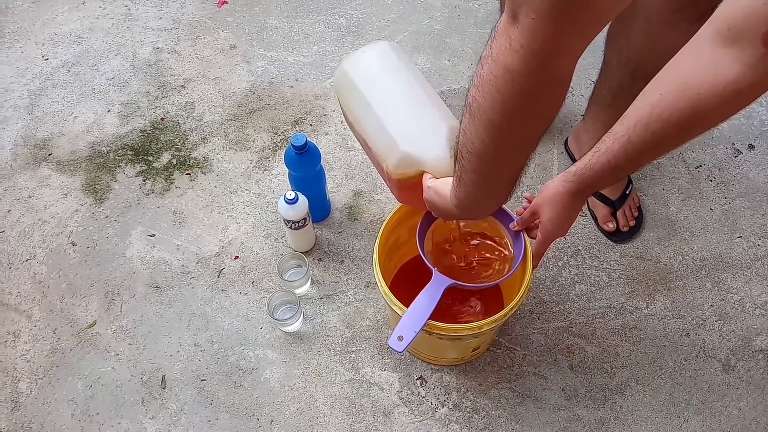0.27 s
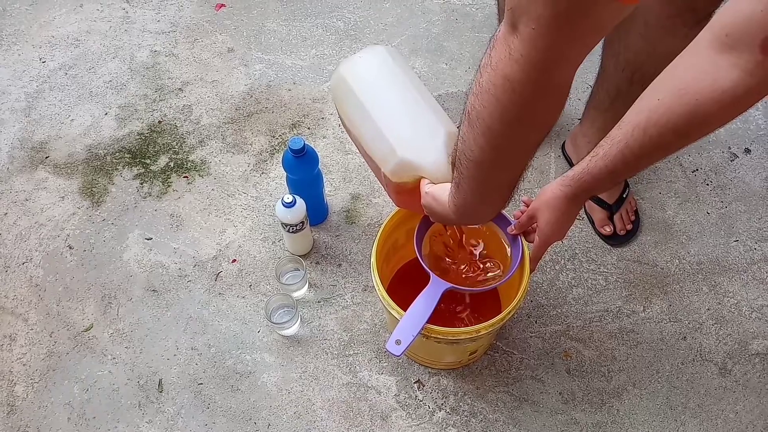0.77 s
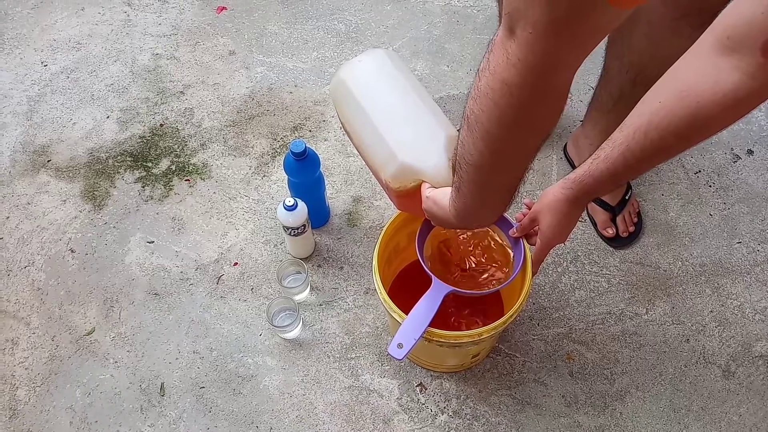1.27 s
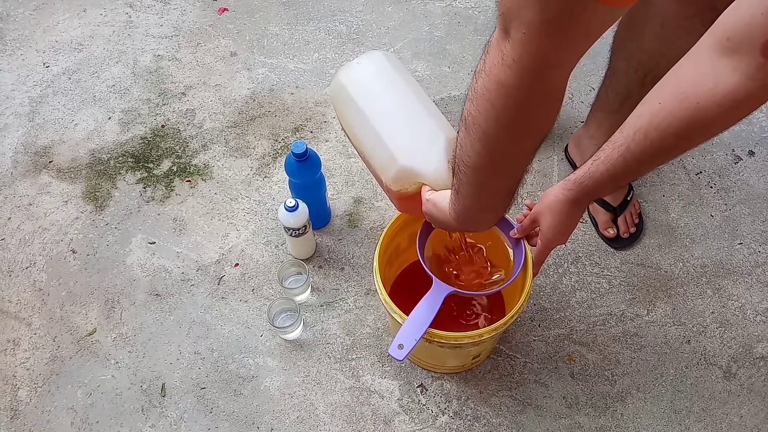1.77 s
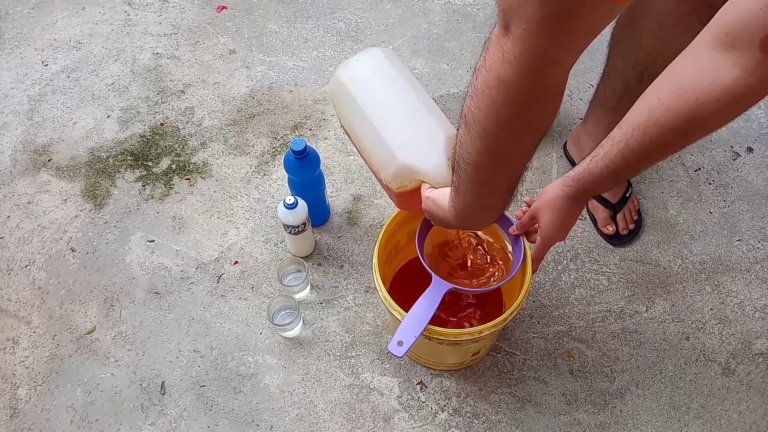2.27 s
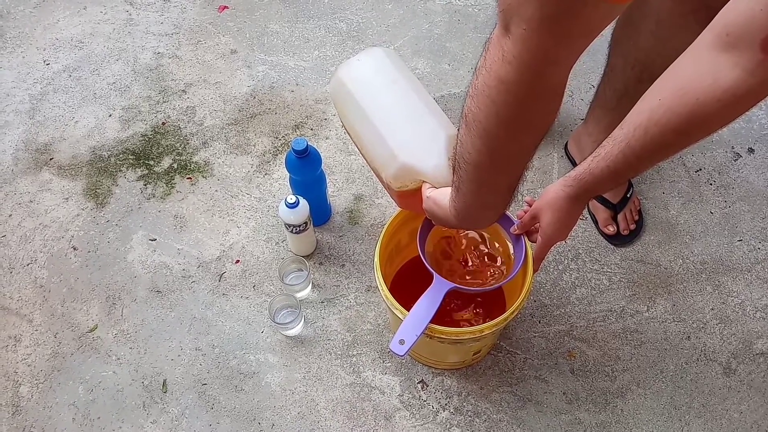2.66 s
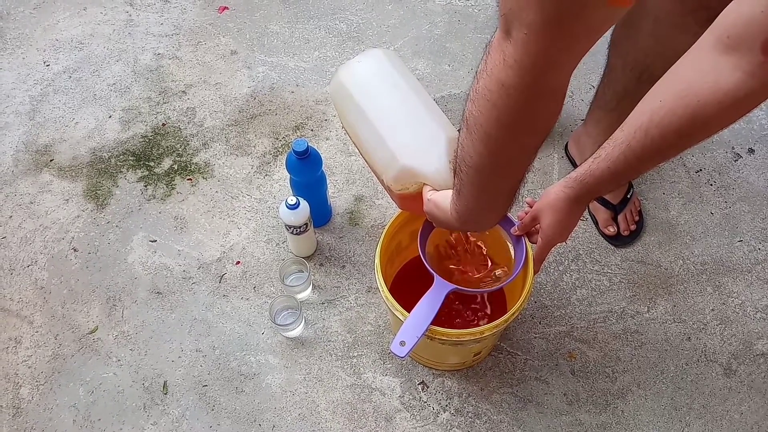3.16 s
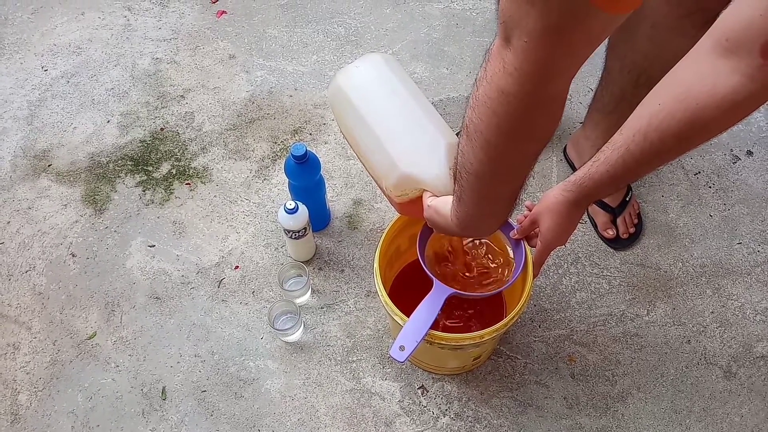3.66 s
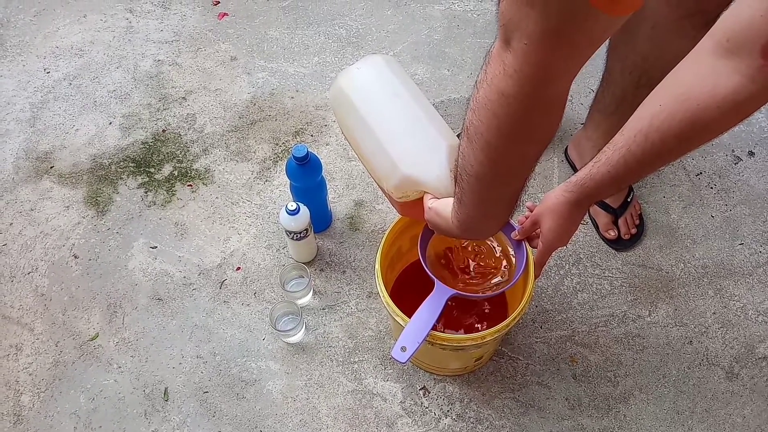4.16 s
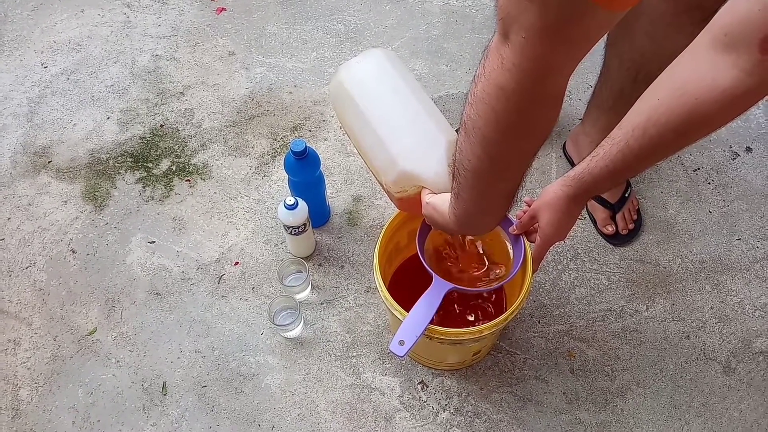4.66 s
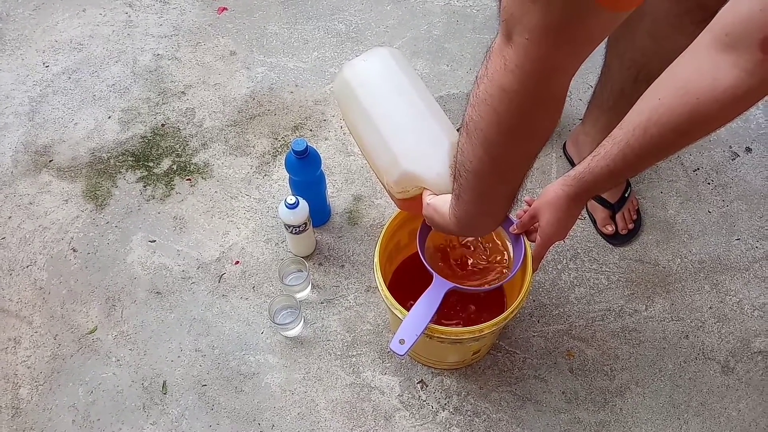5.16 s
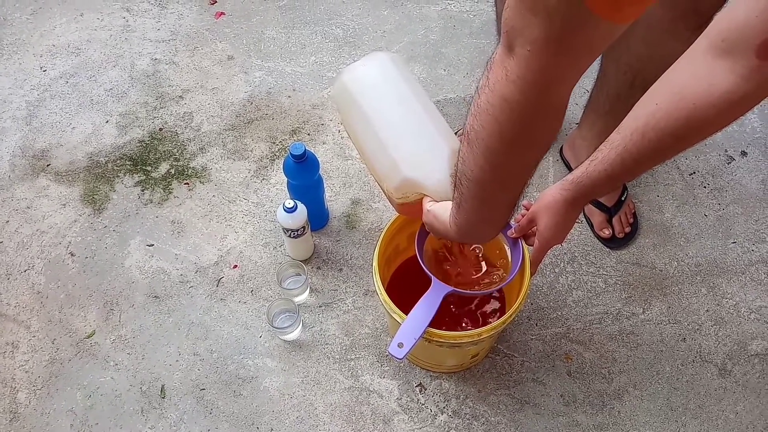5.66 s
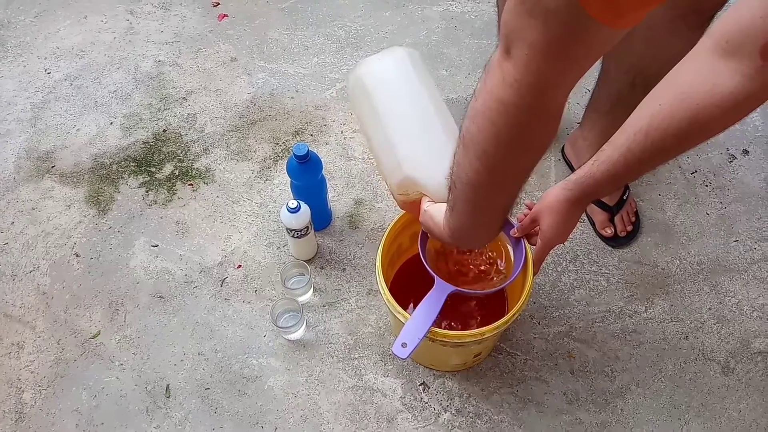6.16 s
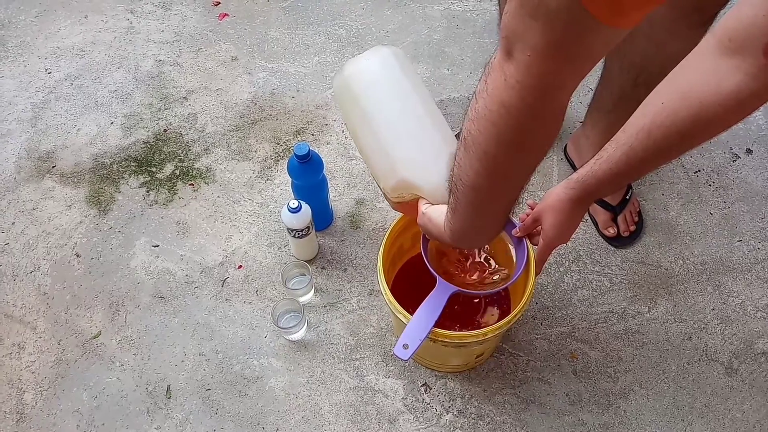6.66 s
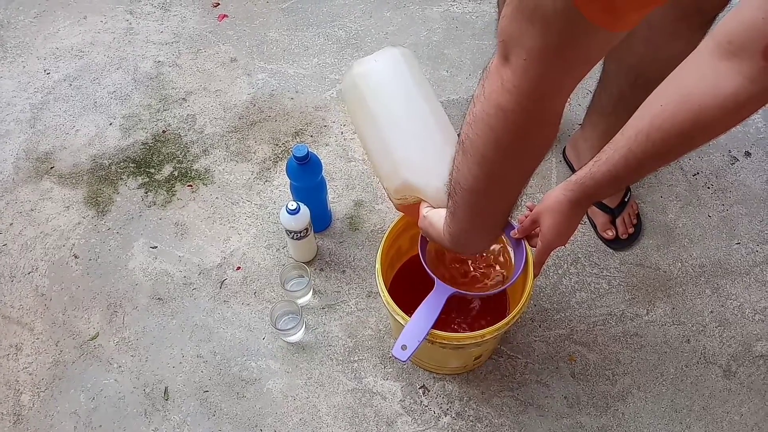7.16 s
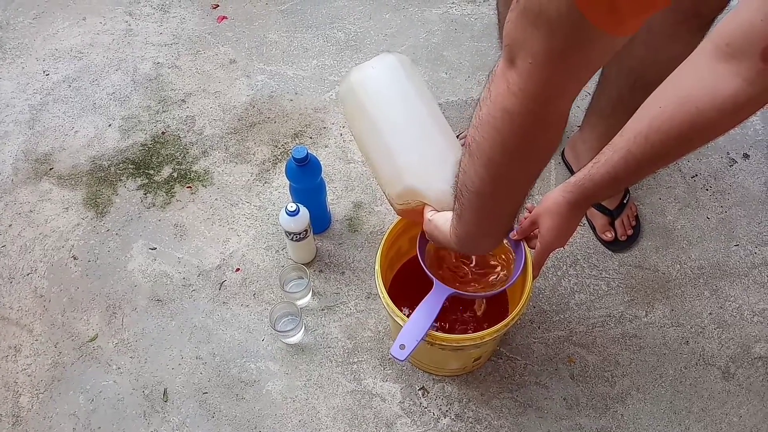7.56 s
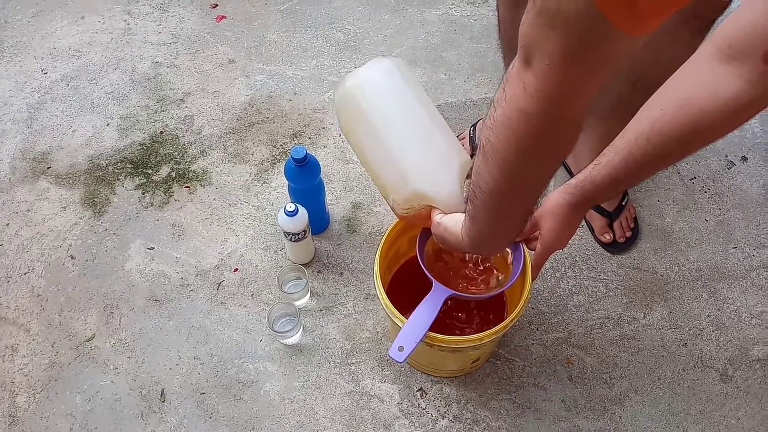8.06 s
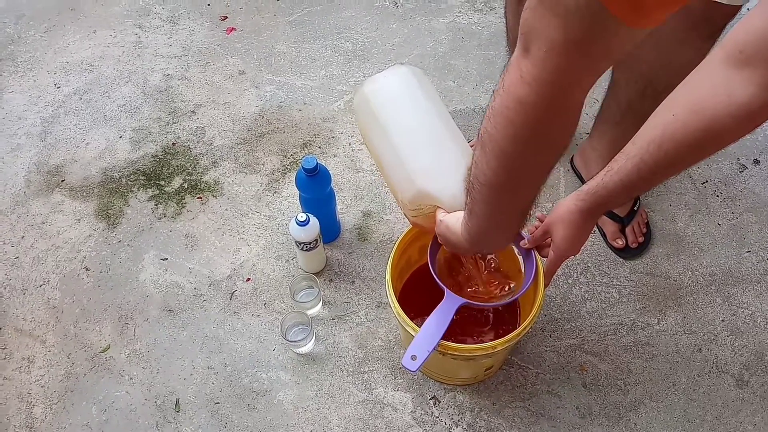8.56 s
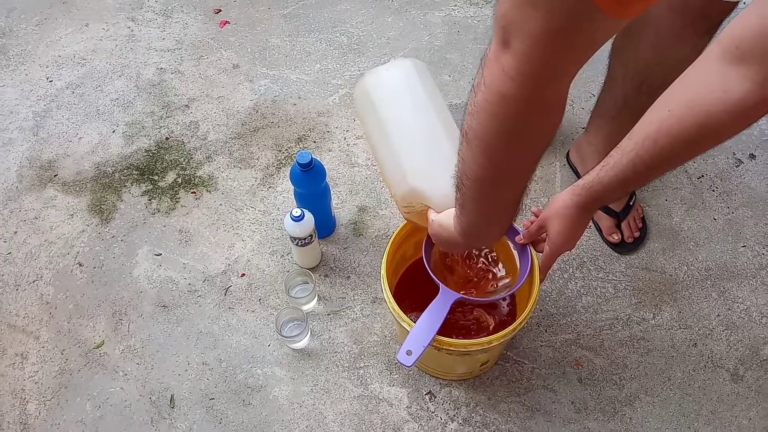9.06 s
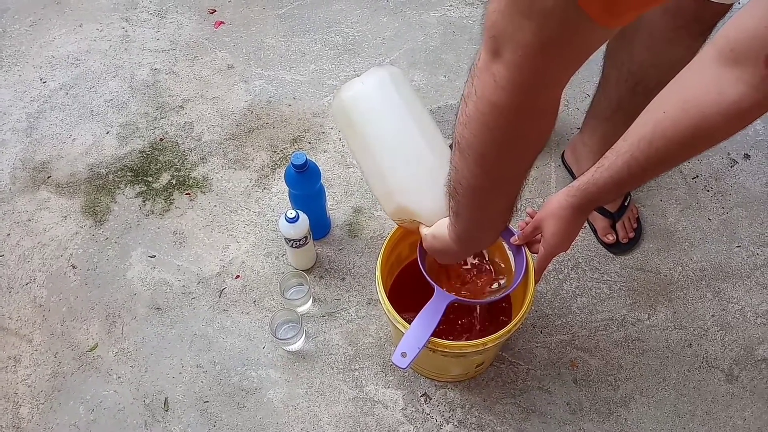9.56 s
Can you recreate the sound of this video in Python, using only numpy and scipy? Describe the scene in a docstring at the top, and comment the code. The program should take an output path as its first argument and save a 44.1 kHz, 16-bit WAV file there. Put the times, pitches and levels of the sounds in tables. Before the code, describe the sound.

Thick oil glugs from a plastic jug in about three gulps a second, plopping and splashing through a strainer into a plastic bucket outdoors.

```python
"""Oil glugging into a bucket

Thick oil leaves a plastic jug, about three gulps a second, and falls through a strainer into a plastic bucket
in a walled yard. Gulped air resonates in the jug; its walls thump as damped low oscillations. Bubbles ring as
chirped, decaying sines; slugs splash, and oil hisses, as coloured clouds of clicks. The pail and the strainer
mesh colour the oil's sounds except the gulps; the yard adds a tail to all of the oil. A faint drone and
coloured noise for the air lie beneath."""
import sys
import numpy as np
from scipy import signal
from scipy.fft import rfft, irfft
from scipy.io import wavfile
from scipy.ndimage import uniform_filter1d

SR = 44100
rng = np.random.default_rng(int(sys.argv[2]) if len(sys.argv) > 2 else 0)


def to_linear_factor(level_db):
    """Convert decibel levels (scalar or array-like) to linear amplitude factors."""
    exponent = np.asarray(level_db, float) / 20
    return 10 ** exponent


def wrap_up_sound(samples):
    """Save the sound to the file named by the first command line argument, as 16-bit audio."""
    columns = np.atleast_2d(samples).T
    # keep every value between -1 and 1, then stretch to whole-number steps
    tamed = np.clip(columns, -1, 1)
    steps = np.round(tamed * 32767).astype(np.int16)
    wavfile.write(sys.argv[1], SR, steps)


N = 432621

# colour of the still air: pitch_hz, relative_level_db
AIR_SPECTRUM = [(30, -50), (60, -8), (95, -7), (200, -4.5), (450, -17.5), (1400, -13), (4000, -24.5),
                (15500, -34.5)]
AIR_DB = -64.5  # rms in the dry mix
# faint far-off drone that comes and goes: time_s, level_db
HUM_LEVEL = [(0.1, -68), (1.2, -68.5), (1.33, -80), (2.1, -65), (3.3, -73.5), (3.6, -89.5)]
HUM_HZ = 90.2
# course of the faint bubbling: time_s, level_db
FIZZ = [(0.0, -56.5), (1.6, -61), (2.76, -78), (4.37, -66.5), (4.45, -50), (5.73, -95), (5.92, -51),
        (6.3, -74), (6.77, -58), (7.45, -60), (7.72, -58.5), (9.8, -63.5)]
# swells of oil trickling through the mesh, one list each: time_s, level_db
TRICKLES = [
    [(4.4, -93), (4.5, -59), (4.62, -84)],
    [(6.43, -66.5), (6.55, -53), (6.62, -74)],
    [(6.92, -52.5), (7.008, -46.5), (7.14, -74)],
    [(7.34, -51), (7.39, -57), (7.425, -45), (7.468, -54), (7.54, -103.5)],
    [(8.02, -84), (8.1, -63.5), (8.25, -84.5)],
    [(9.7, -81.5), (9.775, -58.5), (9.81, -62)],
]
# colour of the spray: pitch_hz, relative_level_db
SPRAY_SPECTRUM = [(600, -14), (1000, 2.5), (1600, -0.5), (3500, -1), (6000, -5), (11000, -12.5),
                  (12200, -24), (15500, -28.5)]
# low thumps of the jug: start_s, level_db, length_s
THUMPS = [(0.019, -41, 0.01), (0.081, -40, 0.021), (2.295, -55, 0.029), (2.414, -55, 0.15),
          (2.796, -49.5, 0.056), (3.1, -54.5, 0.1), (3.471, -51, 0.065), (3.846, -48, 0.07),
          (4.203, -53.5, 0.15), (4.561, -50.5, 0.16), (4.787, -54, 0.047), (4.897, -51, 0.16),
          (5.259, -49, 0.13), (5.6, -49.5, 0.1), (5.847, -31.5, 0.02), (5.865, -11.5, 0.013),
          (5.888, -18.5, 0.014), (5.96, -19.5, 0.012), (6.008, -31, 0.014), (6.07, -23, 0.011),
          (6.089, -39.5, 0.056), (6.275, -47, 0.12), (6.393, -57, 0.12), (6.527, -23.5, 0.0084),
          (6.606, -45, 0.037), (6.944, -45, 0.082), (7.106, -33.5, 0.023), (7.135, -28, 0.013),
          (7.263, -43.5, 0.095), (7.528, -54, 0.037), (7.579, -52.5, 0.089), (8.013, -49, 0.053),
          (8.075, -42.5, 0.025), (8.142, -36, 0.022), (8.718, -66, 0.2), (9.2, -61, 0.076),
          (9.411, -62, 0.03)]
# colour of the rough part of a thump: pitch_hz, relative_level_db
THUMP_ROUGHNESS = [(30, -42), (70, 4), (130, -3), (250, -11.5), (600, -37)]
# pitch of the jug's wall as the grip shifts: time_s, pitch_hz
WALL_PITCH = [(0, 98), (2.1, 153), (2.31, 74.4), (2.45, 146), (3.3, 111), (5.6, 108.7), (5.9, 128.4),
              (6.1, 107.3), (8.2, 107.7), (8.5, 83.5), (9.8, 75.7)]
WALL_SCATTER = 0.11  # greatest departure, share of pitch
# air gulped in through the neck: start_s, level_db, pitch_hz
GULPS = [(0.167, -51.5, 246.7), (0.462, -49.5, 265.3), (0.762, -55.5, 269.3), (1.077, -51, 247),
         (1.389, -48.5, 236.3), (1.734, -46.5, 241.5), (2.087, -45.5, 231), (2.454, -44, 239.4),
         (2.816, -45, 202.7), (3.178, -46.5, 218.4), (3.549, -47.5, 208), (4.284, -46.5, 292),
         (4.628, -50.5, 202), (4.986, -48, 310.7), (5.323, -49, 299.5), (5.671, -48.5, 296),
         (6.29, -50, 195), (8.174, -43, 124.5)]
GULP_HOLD_S, GULP_T60_S = 0.035, 0.19
# slugs landing in the pool: start_s, level_db, lowest_ring_db, highest_ring_db
LANDINGS = [(0.975, -53.5, -45, -2.5), (1.423, -46.5, -45, 6), (1.732, -43.5, -14.5, 16.5),
            (2.072, -47, -5.5, 24), (2.407, -45, -25, -9.5), (2.81, -59, 15.5, -8.5),
            (3.157, -38, -3.5, -15), (3.52, -38, -6, 10), (3.887, -40.5, -0.5, -11),
            (4.263, -44.5, -7.5, 8.5), (4.621, -44.5, -7.5, -8), (4.976, -47, 1.5, 0.5),
            (5.324, -42.5, 5, 6.5), (5.671, -40, 5, -10), (6.016, -35, -8.5, -12), (6.357, -43, -5.5, -22),
            (6.539, -37.5, -15, -12), (6.693, -29, -23, -2), (7.008, -38.5, 3.5, 5.5),
            (7.323, -65, 14, 21.5), (7.646, -45.5, 9.5, 8.5), (8.631, -45, -9.5, -45.5)]
# rings of the pail at a landing: pitch_hz, relative_level_db
PAIL_RINGS = [(420, 0), (695, -1), (2700, -13.5)]
RING_SCATTER = 0.021  # standard deviation, share of pitch
# bubbles and drops, loud and faint, some sounding at several pitches at once: start_s, level_db, pitch_hz
POPS = [(0.03, -56.5, 2500), (0.118, -46, 776), (0.143, -51.5, 620), (0.305, -58.5, 645),
        (0.398, -52.5, 628), (0.498, -41.5, 2527), (0.6, -48.5, 2604), (0.607, -51.5, 964),
        (0.71, -54.5, 1420), (0.757, -46, 1424), (0.783, -45.5, 2194), (0.93, -50.5, 1590),
        (0.961, -48.5, 2005), (0.975, -38, 975), (1.08, -50, 1560), (1.137, -46, 1940), (1.147, -48, 778),
        (1.237, -45.5, 1445), (1.276, -32.5, 948), (1.396, -37, 1330), (1.427, -47.5, 2420),
        (1.537, -41.5, 747), (1.538, -47, 2050), (1.636, -48.5, 947), (1.747, -55.5, 3880),
        (1.759, -40.5, 1920), (1.868, -52, 632), (1.87, -46.5, 1505), (2.006, -50, 2700),
        (2.005, -44.5, 1005), (2.194, -53, 8630), (2.25, -59.5, 995), (3.063, -64, 3260),
        (2.419, -51.5, 1383), (2.72, -53.5, 1016), (2.31, -54.5, 422), (2.782, -50, 7420),
        (2.85, -57.5, 1720), (3.062, -49.5, 2640), (3.22, -54.5, 1423), (3.319, -49, 1036),
        (3.5, -32, 1177), (3.506, -39.5, 1693), (3.546, -40, 359), (3.586, -44, 1160), (3.788, -46.5, 3900),
        (3.788, -43.5, 2650), (3.922, -51.5, 2310), (3.964, -46, 1383), (4.085, -44.5, 1136),
        (4.234, -54.5, 2530), (4.335, -47.5, 1284), (4.465, -50.5, 776), (4.523, -50, 9840),
        (4.574, -44.5, 913), (4.601, -50.5, 2220), (4.616, -44.5, 1235), (4.684, -44.5, 1354),
        (4.785, -56, 855), (4.896, -46.5, 3560), (4.973, -45.5, 1318), (5.044, -41.5, 1420),
        (5.134, -54.5, 790), (5.145, -42, 1435), (5.305, -56, 5050), (5.65, -55.5, 5200),
        (5.388, -45, 1290), (5.481, -46, 1209), (5.572, -48.5, 7460), (5.885, -47, 5580),
        (5.926, -55.5, 3930), (6.0, -47, 1480), (6.714, -58, 596), (6.753, -54.5, 6800), (6.788, -45, 960),
        (6.839, -47, 1460), (6.861, -43.5, 746), (7.22, -55.5, 850), (7.231, -57, 3490), (7.33, -46, 3840),
        (7.428, -51.5, 2444), (7.694, -47, 5120), (7.696, -48, 1460), (7.812, -32.5, 1453),
        (7.813, -44, 3340), (7.814, -33.5, 2080), (8.035, -44, 1230), (8.17, -64.5, 690),
        (8.267, -53, 2450), (8.293, -43, 1560), (8.297, -38.5, 2110), (8.633, -47, 7080),
        (8.772, -40, 1506), (8.773, -47.5, 2560), (8.774, -45.5, 997), (8.774, -51, 6910),
        (8.846, -49, 462), (8.852, -44.5, 894), (9.002, -55.5, 3425), (9.168, -49, 2244),
        (9.197, -61.5, 3700), (9.222, -46.5, 915), (9.394, -50, 1024), (9.775, -41, 422),
        (9.777, -54, 7970), (9.784, -37, 1033), (0.408, -60, 2164), (0.763, -53, 4710),
        (1.277, -51.5, 3910), (1.398, -52, 2700), (1.426, -58, 4320), (2.07, -41.5, 5500),
        (0.548, -54, 880), (2.399, -59.5, 3384), (4.52, -56, 4980), (4.655, -55.5, 7540),
        (4.49, -52.5, 1497), (6.021, -57, 10500), (6.358, -54, 6630), (7.326, -45, 2803),
        (7.763, -55, 7130), (8.312, -64, 3950), (2.732, -62.5, 3730), (9.0, -61, 6820), (9.06, -62.5, 7500),
        (4.983, -33.5, 11070), (4.983, -38.5, 6240), (8.4, -61, 2700), (8.95, -59.5, 2780),
        (8.775, -60, 5240), (8.634, -62, 4090), (4.515, -56, 2570), (0.976, -51, 643), (2.05, -51.5, 870),
        (4.405, -60, 1516), (1.735, -42.5, 3050), (3.0, -69.5, 3710)]
LINGER_DB, LINGER_TIMES = -15.5, 4.16  # a fainter hum under each bubble, and how many times as long
# slugs of oil hitting the mesh: start_s, level_db, t60_s, treble_db
SPLASHES = [(0.597, -53.5, 0.13, -3), (0.764, -48, 0.027, -24), (1.229, -54.5, 0.035, 3),
            (1.538, -55.5, 0.027, 9), (1.734, -43, 0.046, -12), (1.277, -39, 0.034, 2),
            (2.0694, -40, 0.036, -4), (3.1607, -46.5, 0.035, 5), (3.498, -46, 0.1, -13),
            (7.589, -48.5, 0.32, -17), (8.529, -58.5, 0.04, -4), (3.523, -35.5, 0.036, 4),
            (3.891, -35, 0.033, 10), (4.2631, -35.5, 0.046, -1), (4.6234, -31, 0.031, -18.5),
            (4.9817, -37.5, 0.043, 5.5), (5.33, -32, 0.0089, 2.5), (5.676, -32.5, 0.016, -1.5),
            (6.0191, -32, 0.019, -5), (6.0419, -34, 0.014, 1.5), (6.3589, -43.5, 0.06, -10.5),
            (6.5439, -51.5, 0.0093, 18.5), (6.6971, -31.5, 0.014, 5.5), (7.013, -30.5, 0.0053, 6),
            (7.3236, -42.5, 0.096, 2.5), (7.763, -48, 0.062, -0.5), (8.268, -54, 0.04, 4),
            (8.633, -51, 0.036, 13.5), (8.725, -43.5, 0.094, -46), (9.17, -53, 0.037, 0),
            (9.561, -57, 0.028, 0.5), (9.29, -64, 0.048, -2.5), (9.612, -58, 0.089, -19),
            (0.398, -61, 0.03, 11), (9.776, -53.5, 0.089, 6)]
# side signal against the spray: pitch_hz, relative_level_db
SPRAY_WIDTH = [(2500, -50), (4500, -12), (12000, -8)]
# resonances and cancellations of the pail and the strainer mesh: pitch_hz, width_hz, gain_db
PAIL_AND_MESH = [(1123, 90, -22.5), (609, 43, 5), (2700, 58, 4.5), (6420, 2140, 5.5), (3880, 580, 5),
                 (8800, 260, -4)]
# decay of the yard's tail: pitch_hz, t60_s
YARD_DECAY = [(200, 0.29), (1400, 0.32), (2500, 0.39), (4500, 0.12), (9700, 0.093)]
YARD_DB = -6.5  # energy of the tail's response


def rms_one(x):
    """Normalisation: scale to unit rms."""
    return x / np.sqrt(np.mean(x ** 2) + 1e-20)


def in_time(rows):
    """Linear interpolation: read a (time, value) curve at every sample."""
    time_s, value = np.transpose(rows)
    return np.interp(np.arange(N) / SR, time_s, value)


def at_hz(points, hz):
    """Logarithmic frequency: read a (pitch, value) table on a log axis."""
    pitch_hz, value = np.transpose(points)
    return np.interp(np.log(hz + 1), np.log(pitch_hz), value)


def colour(x, spectrum):
    """Linear filtering: weight the Fourier spectrum of x by the table's gains."""
    hz = np.fft.rfftfreq(len(x), 1 / SR)
    return irfft(rfft(x) * to_linear_factor(at_hz(spectrum, hz)), len(x))


def drift(rate_hz):
    """Low-passed noise: two equal poles at rate_hz leave slow chance of unit rms."""
    r = np.exp(-40 * np.pi * rate_hz / SR)  # worked at a twentieth of the sample rate
    noise = rng.standard_normal(N // 20 + 2002)
    slow = signal.lfilter([1], [1, -2 * r, r * r], noise)[2000:]
    return np.interp(np.arange(N) / 20, np.arange(len(slow)), rms_one(slow))


def add(out, start_s, sound):
    """Superposition: mix a sound in at its start, kept within the scene."""
    i = min(max(round(start_s * SR), 0), N - 1)
    out[i:i + len(sound)] += sound[:N - i]


def swell(t, rise_s, t60_s):
    """Exponential build-up and decay: a quick rise, then a fall, with its top at 1."""
    shape = (1 - np.exp(-t / max(rise_s, 1e-4))) * to_linear_factor(-60 * t / max(t60_s, .005))
    return shape / shape.max()


def bubble(t, hz, cycles, climb):
    """Bubble resonance: a sine that blooms smoothly to 1, dies and rises in pitch by the climb, if any."""
    age = t * hz / cycles
    envelope = (np.e * age) ** 2 / 4 * np.exp(-age)
    return envelope * np.sin(2 * np.pi * hz * t * (1 + climb * np.tanh(age / 8)))


def droplets(per_s, size_db):
    """Shot noise: random tiny clicks of uneven size in the colour of the spray, with unit rms."""
    sizes = to_linear_factor(size_db * np.minimum(rng.exponential(1, N), 5)) * rng.choice([-1, 1], N)
    return rms_one(colour(sizes * (rng.random(N) < per_s / SR), SPRAY_SPECTRUM))


def still_air():
    """Broadband noise: steady random pressure, filtered to the colour of the air."""
    return to_linear_factor(AIR_DB) * rms_one(colour(rng.standard_normal(N), AIR_SPECTRUM))


def hum():
    """Modulated sine: a low drone that wavers a little in level and pitch."""
    level = to_linear_factor(in_time(HUM_LEVEL) + 1.7 * drift(4.0))
    return level * np.sin(2 * np.pi * HUM_HZ * np.cumsum(1 + .012 * drift(3.0)) / SR)


def small_bubbles(per_s=420.0, level_db=-20.0, spread_db=11.0, clump_s=0.013):
    """Random superposition: faint bubbles in clumps of three of like size, over about four octaves."""
    out, t = np.zeros(N), np.arange(3000) / SR
    for when, pitch, size, *kin in rng.random((int(per_s * N / SR / 3), 9)):
        db = level_db - spread_db * np.log10(size + 0.015) - 12 * abs(pitch - .45)
        for late, off in np.reshape(kin, (3, 2)):
            hz = 550 * 2 ** (3.8 * pitch ** 2 + .4 * (off - .5))
            add(out, when * N / SR + clump_s * late, to_linear_factor(db) * bubble(t, hz, 3.9, 0.039))
    return out * to_linear_factor(in_time(FIZZ))


def spatter(level_db=-28.0, size_db=2.5, span_s=0.2, fade_db=13.5):
    """Random superposition: each slug leaves a fading mass of tiny bubbles, the highest ones first."""
    out, t = np.zeros(N), np.arange(600) / SR
    for (s, slug_db, *_), drops in zip(SPLASHES, rng.random((len(SPLASHES), 90, 3))):
        for when, pitch, size in drops:
            db = slug_db + level_db - fade_db * when + size_db * np.log10(size + 0.039)
            hz = 1200 * 2 ** (2.8 * pitch * (1 - .5 * when))
            add(out, s + span_s * when ** 1.3, to_linear_factor(db) * bubble(t, hz, 1.77, 0.0091))
    return out


def trickle():
    """Modulated shot noise: at times the oil sheets through the mesh in a swelling hiss."""
    t = np.arange(N) / SR
    level = 0
    for rows in TRICKLES:
        level = level + to_linear_factor(in_time(rows)) * (t > rows[0][0]) * (t < rows[-1][0])
    unevenness = to_linear_factor(3 * np.tanh(drift(33.0)) - 10)
    return uniform_filter1d(level, size=300) * unevenness * droplets(9000, 3.0)


def thumps(edge_s=0.0097, tail_db=-20, tail_t60_s=0.38, snap_s=0.021):
    """Damped wall oscillation: the jug caves in and springs back, cleaner in a quick snap, then hums."""
    out, t = np.zeros(N), np.arange(12000) / SR
    rough = rms_one(colour(rng.standard_normal(N), THUMP_ROUGHNESS))
    for (s, db, length_s), off in zip(THUMPS, rng.random(len(THUMPS))):
        hz = np.interp(s, *np.transpose(WALL_PITCH)) * (1 + WALL_SCATTER * (2 * off - 1))
        rise = np.clip(t / edge_s, 0, 1)
        push = rise * np.clip((length_s + edge_s - t) / edge_s, 0, 1)
        tail = rise * to_linear_factor(tail_db - 60 * t / tail_t60_s)
        start = round(s * SR)
        wobble = min(length_s / snap_s, 1) * np.resize(rough[start:start + len(t)], len(t))
        add(out, s - edge_s / 2, to_linear_factor(db - 2.5) * (push + tail) * (np.sin(2 * np.pi * hz * t) + wobble))
    return signal.sosfilt(signal.butter(3, [40, 450], "band", fs=SR, output="sos"), out)


def gulps(rough=0.75, breathy_db=-7.0):
    """Cavity resonance: the jug's air is a spring that rings unevenly as the neck opens and shuts."""
    out, t = np.zeros(N), np.arange(16000) / SR
    flutter = drift(39.0)
    waver = np.cumsum(drift(17.6)) / SR
    churn = to_linear_factor(breathy_db) * np.array([drift(60.0), drift(43.0)])
    for s, db, hz in GULPS:
        phase = 2 * np.pi * hz * (t + .045 * np.interp(s + t, np.arange(N) / SR, waver))
        start = round(s * SR)
        a, b = churn[:, start:start + len(t)]
        ring = (1 + a) * np.sin(phase) + b * np.cos(phase)
        decay = to_linear_factor(-60 * np.maximum(t - GULP_HOLD_S, 0) / GULP_T60_S)
        add(out, s - .008, to_linear_factor(db - 0.5) * np.minimum(t / 0.0041, 1) * decay * ring)
    return out * (1 + rough * np.tanh(flutter))


def landings():
    """Modal excitation: each landing sounds every ring of the pail, as (start_s, level_db, pitch_hz)."""
    rows = []
    chance = rng.standard_normal((len(LANDINGS), len(PAIL_RINGS)))
    for (s, db, low_db, top_db), scatter in zip(LANDINGS, chance):
        for (hz, ring_db), extra_db, off in zip(PAIL_RINGS, (low_db, 0, top_db), scatter):
            rows.append((s, db + ring_db + extra_db, hz * (1 + RING_SCATTER * off)))
    return rows


def pops(rows, cycles=1.394, climb=0.074, spread=0.064, scatter_s=.006, froth_s=.04):
    """Bubble resonance: each row rings and hums on; two neighbours of like size and fainter froth join it."""
    out, t = np.zeros(N), np.arange(5000) / SR
    neighbour_db, froth_db, froth_octaves = -8, -10, .08
    for (s, db, hz), chance in zip(rows, rng.standard_normal((len(rows), 6, 2))):
        family = [(0.0002, 1.05, 0.932)]  # lag in s, relative dB, pitch ratio before the climb
        for late, size in chance[:2]:
            ratio = 1 + spread * size * (1 + (hz / 7000) ** 2)
            family.append((scatter_s * abs(late), neighbour_db, ratio))
        for late, size in chance[2:]:
            family.append((froth_s * abs(late), froth_db - 5.2 * abs(late), 2 ** (froth_octaves * size)))
        # higher bubbles ring for more cycles
        linger_cycles = LINGER_TIMES * cycles * min(hz / 1000, 9.0) ** 0.5
        ring_cycles = cycles * min(hz / 1000, 9.0) ** 0.51
        add(out, s, to_linear_factor(db + LINGER_DB) * bubble(t, hz, linger_cycles, 0))
        for late_s, rel_db, ratio in family:
            add(out, s + late_s, to_linear_factor(db + rel_db) * bubble(t, hz * ratio, ring_cycles, climb))
    return out


def splashes(colour_db=6.5):
    """Impulsive shot noise: slugs burst on the mesh in lumpy, dying sprays, each of its own colour."""
    out, t = np.zeros(N), np.arange(10000) / SR
    spray = droplets(5000, 3.57) * to_linear_factor(2.0 * np.tanh(drift(60.0)))  # the slug lands in uneven lumps
    bands_hz = np.geomspace(1000, 13000, 16)
    for (s, db, t60_s, treble_db), chance in zip(SPLASHES, rng.standard_normal((len(SPLASHES), 16))):
        envelope = to_linear_factor(db - 9.5) * swell(t, 0.0049, t60_s)
        tint_db = colour_db * np.tanh(chance) + treble_db / (1 + (5000 / bands_hz) ** 4)
        grains = np.resize(spray[round(s * SR):], len(t))
        add(out, s - .0005, envelope * colour(grains, np.transpose([bands_hz, tint_db])))
    return out


def bucket(x):
    """Resonant filtering: the pail and the strainer mesh favour some pitches and cancel others."""
    hz = np.fft.rfftfreq(N, 1 / SR)
    gain_db = sum(db / (1 + (2 * (hz - centre) / width) ** 2) for centre, width, db in PAIL_AND_MESH)
    return irfft(rfft(x) * to_linear_factor(gain_db), N)


def yard(x):
    """Reverberation: walls and bucket return a dense tail whose decay time varies with pitch."""
    t, tail = np.arange(SR // 2) / SR, 0
    edges_hz = 120 * 2.0 ** np.arange(8)
    for low, high in zip(edges_hz, edges_hz[1:]):
        octave = signal.butter(2, [low, high], "band", fs=SR, output="sos")
        band = signal.sosfilt(octave, rng.standard_normal(len(t)))
        tail = tail + band * to_linear_factor(-60 * t / at_hz(YARD_DECAY, np.sqrt(low * high)))
    tail = tail * np.minimum(t / 0.0063, 1)
    return to_linear_factor(YARD_DB) * signal.fftconvolve(x, tail / np.sqrt(np.sum(tail ** 2)))[:N]


def scene():
    """Superposition: all sources share one spot; only the spray's treble differs between channels."""
    spray = bucket(splashes())
    bubbles = pops(POPS) + pops(landings()) + small_bubbles() + spatter()
    oil = spray + bucket(bubbles + trickle()) + gulps()
    mid = oil + yard(oil) + thumps() + hum() + still_air()
    side = colour(np.roll(spray, 120), SPRAY_WIDTH)  # 120 samples late
    return np.array([mid + side, mid - side])


def suppressor(x, over_db=3.5, deepest_db=-12.0, release=0.72):
    """Spectral subtraction: turn each bin down unless its smoothed power exceeds its own quiet level."""
    spectrum = signal.stft(x, nperseg=1024, noverlap=768)[2]
    power = uniform_filter1d(np.mean(np.abs(spectrum) ** 2, axis=0), size=3, axis=0)
    quiet = np.percentile(power, 30, axis=1, keepdims=True)
    power = signal.lfilter([1 - release], [1, -release], power, axis=1)  # one-pole smoothing by frame
    kept = 1 - to_linear_factor(2 * over_db) * quiet / (power + 1e-20)
    gain = np.sqrt(np.clip(kept, to_linear_factor(2 * deepest_db), 1))
    return signal.istft(spectrum * gain, nperseg=1024, noverlap=768)[1][:, :N]


def roll_off(x):
    """The treble ends steeply here."""
    return signal.sosfilt(signal.butter(12, 16390, fs=SR, output="sos"), x)


def record(dry):
    """Band limiting: noise reduction, then a steep low-pass that closes the top."""
    low_pass = signal.cheby2(10, 50, 16200, fs=SR, output="sos")
    mix = signal.sosfilt(low_pass, suppressor(dry))
    return roll_off(mix)


dry = scene()
out = record(dry)
wrap_up_sound(out)
```